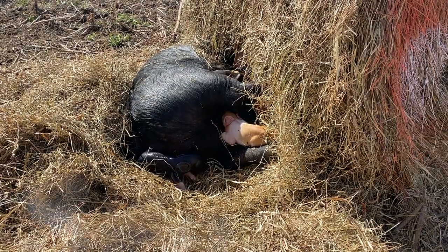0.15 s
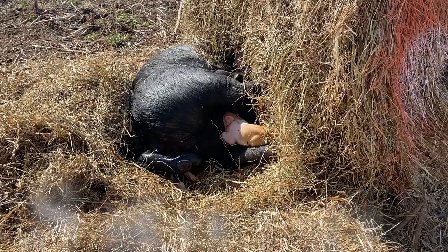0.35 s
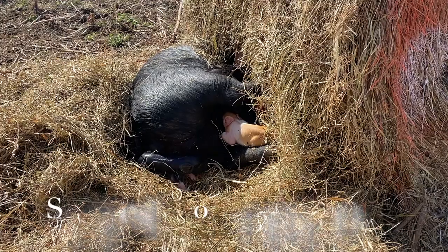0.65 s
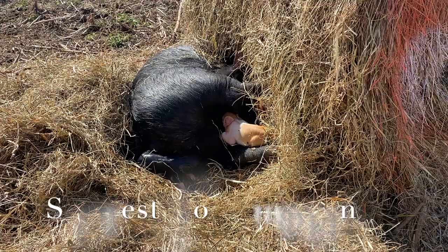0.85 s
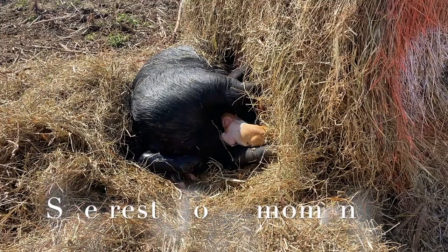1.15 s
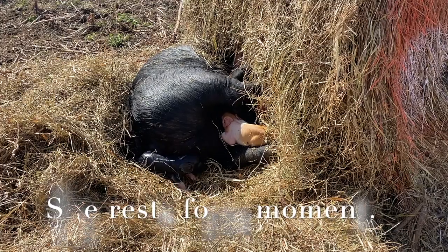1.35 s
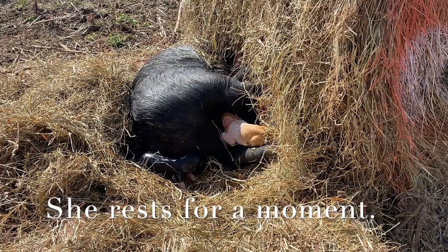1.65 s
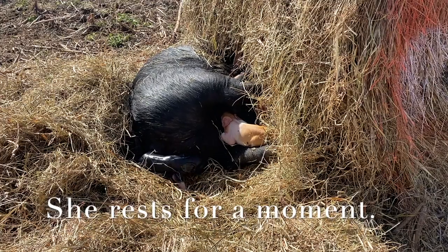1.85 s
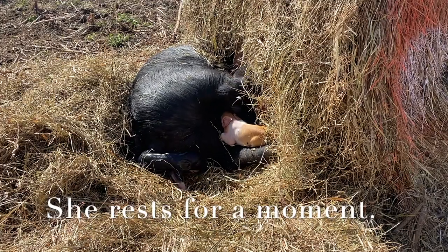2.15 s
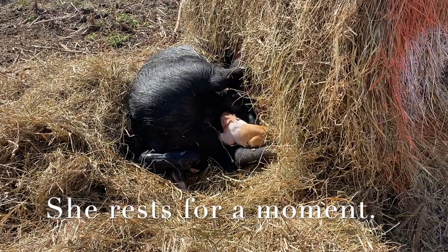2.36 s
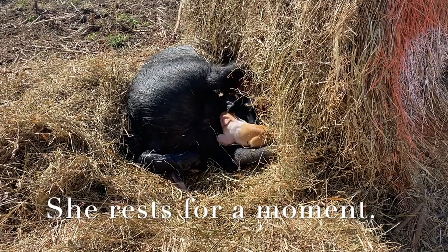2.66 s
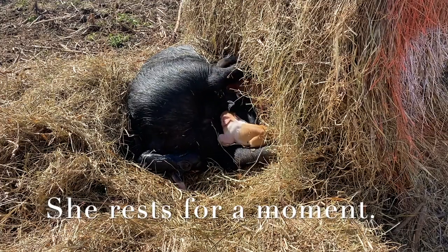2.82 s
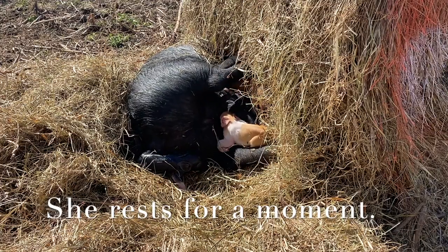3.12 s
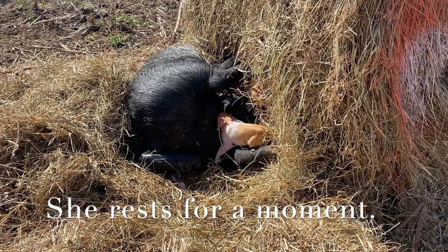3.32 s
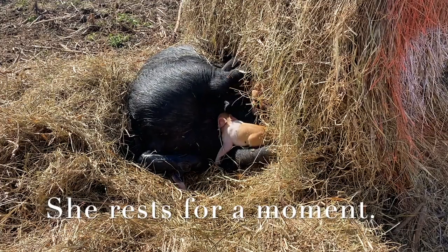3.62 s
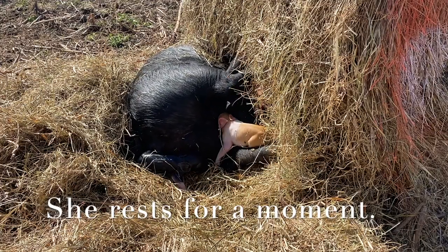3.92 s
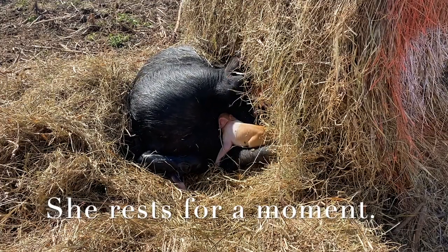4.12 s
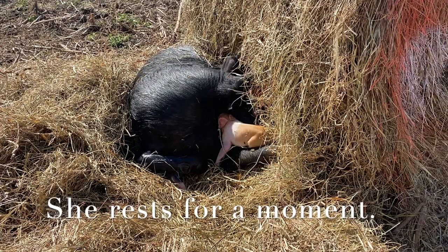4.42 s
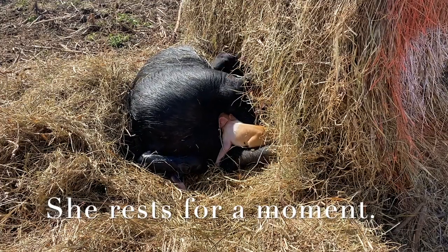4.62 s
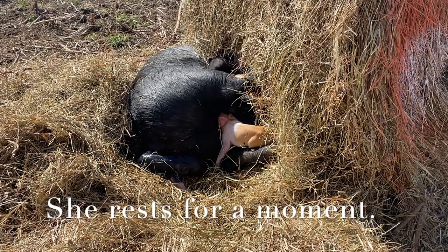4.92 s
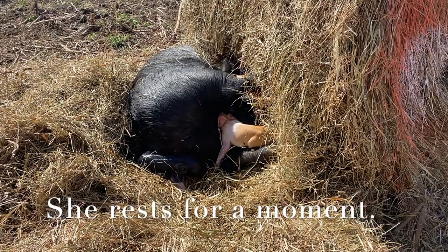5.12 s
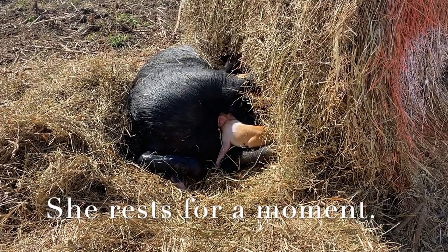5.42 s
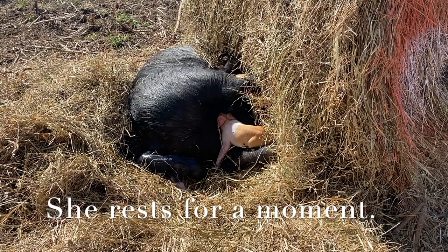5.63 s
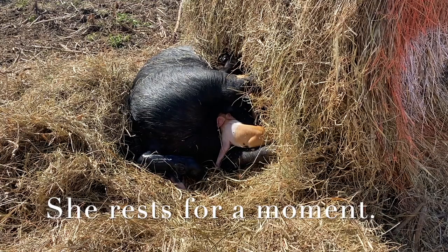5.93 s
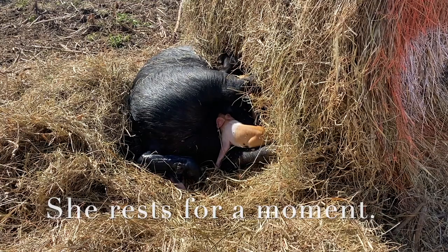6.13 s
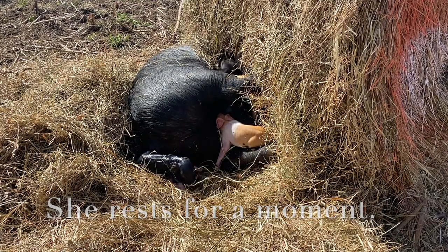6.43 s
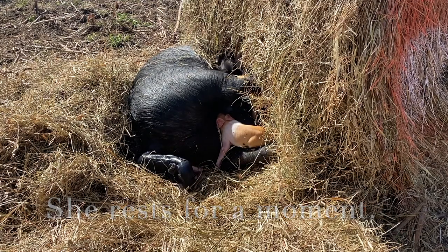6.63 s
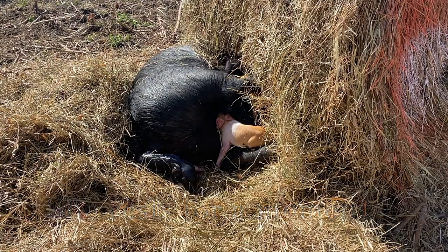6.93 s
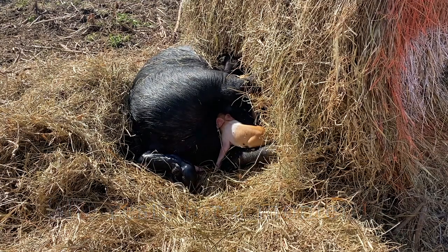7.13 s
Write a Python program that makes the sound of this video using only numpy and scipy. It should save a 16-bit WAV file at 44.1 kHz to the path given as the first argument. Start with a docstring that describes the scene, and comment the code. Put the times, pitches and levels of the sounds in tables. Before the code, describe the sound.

A close stereo microphone in a breezy farmyard picks up crunching hay, a high piglet scream under half a second long, and its weak trailing whimper. Rattling sow grunts follow in quick succession, with small lip smacks. Afterwards it calms: dry stalks tick and snap, a distant bird repeats a short arching call, occasional faint croaky grunts come and go, and soft wind rumbles throughout.

```python
"""A newborn piglet squeals in a nest of hay: a whistle with overtones, chopped into rasp by an oscillator.
The sow answers in creaking grunts, fainter on the whole later on: each flap rings her resonances.
Hay rustles, crunches and snaps as random grains and short puffs of noise; a short squeak breaks in.
A distant bird calls four times in arching harmonics, and a small bird gives one falling note.
Beneath lies wind, made of coloured noise in four bands of changing level."""
import sys
import numpy as np
from scipy import signal
from scipy.fft import rfft, irfft, next_fast_len
from scipy.io import wavfile

SR = 44100
rng = np.random.default_rng(int(sys.argv[2]) if len(sys.argv) > 2 else 0)


def file_out(sig):
    """Save sig as 16-bit WAV at sys.argv[1]."""
    # one column per channel
    cols = np.atleast_2d(sig).T
    # limit, then scale
    lim = np.clip(cols, -1, 1)
    pcm = np.round(lim * 32767).astype(np.int16)
    wavfile.write(sys.argv[1], SR, pcm)


N = 320607
TIME = np.arange(N) / SR

# Wind spectra, deepest band first: frequency_hz, gain_db
RUMBLE_COLOUR = [(18, -27), (32, -2), (48, 3), (72, 13.5), (95, 3.5), (130, -50), (400, -113)]
GUST_COLOUR = [(40, -45), (85, -3), (120, 2), (150, -10), (200, -54), (600, -131)]
BUFFET_COLOUR = [(60, -48), (130, 2), (180, 3), (280, -7.5), (400, -13.5), (800, -48), (2500, -94)]
ROAR_COLOUR = [(60, -28), (150, -4.5), (300, 3.5), (500, 1), (720, 4), (1000, -4.5), (1500, -17.5),
               (2000, -28), (4000, -32), (16000, -81)]
# Course of each wind band: time_s, level_db
RUMBLE_LEVEL = [(0, -47.5), (.7, -52), (1.4, -50), (2.2, -51.5), (2.6, -55), (3.05, -49.5), (3.35, -56),
                (3.85, -54.5), (4.1, -52), (5.3, -49), (5.65, -53), (6.4, -52), (7.27, -51.5)]
GUST_LEVEL = [(0, -63), (.4, -58), (.85, -46.5), (1.2, -47), (1.5, -42.5), (1.9, -48), (2.3, -44.5),
              (2.85, -52.5), (3.12, -38), (3.25, -53), (3.8, -45.5), (4.3, -49), (4.7, -46), (5.45, -51),
              (5.8, -46), (6.6, -48.5), (6.9, -49.5), (7.27, -45)]
BUFFET_LEVEL = [(0, -44.5), (.33, -50), (.47, -42.5), (1.3, -45.5), (1.62, -40.5), (1.88, -53), (2.25, -45),
                (2.55, -38), (3.05, -42), (3.3, -54), (4.2, -47.5), (4.9, -47), (5.45, -54), (5.98, -51.5),
                (6.27, -41.5), (6.55, -50.5), (6.75, -50), (7.27, -48)]
ROAR_LEVEL = [(0, -49), (.8, -51), (1.3, -49.5), (2, -48.5), (2.5, -49.5), (2.9, -52.5), (3.2, -47.5),
              (3.35, -54.5), (3.7, -49.5), (4.4, -56.5), (4.8, -50.5), (5.15, -55), (5.45, -58.5),
              (6.2, -56.5), (6.8, -60), (7.27, -57)]
EDDY_HZ, EDDY_DB, ROAR_EDDY_DB = 9, 0.9, 3  # pace and depths of the wind's chance swells

# Calls of the distant bird: arch_top_s, length_s, top_pitch_hz, level_db
BIRD_CALLS = [(2.481, 0.12, 778.6, -49), (3.244, 0.11, 782, -51.5), (3.989, .12, 772, -52),
              (4.535, 0.13, 770, -53.5)]
# Fixed throat resonances of that bird: frequency_hz, gain_db
BIRD_THROAT = [(700, -42), (1200, -21), (1400, 8.5), (1560, 16), (1700, 4), (1950, 4), (2350, -4.5),
               (2700, -46), (4000, -26)]
BIRD_FADE_DB = -4  # from the start of a call to its end
PEEP_AT_S, PEEP_START_HZ, PEEP_END_HZ, PEEP_DB = 7.085, 6680, 6590, -73

# Faint rustle as the nest settles, before colouring: time_s, level_db
SETTLING = [(0, -70), (1.1, -67), (2.9, -67), (4.3, -69), (5.2, -72), (5.9, -76), (7.27, -76)]
# Swells of rustle as the animals shift, before colouring: centre_s, length_s, level_db
SHIFTS = [(.68, 0.33, -61.5), (1.355, 0.11, -58), (1.71, 0.3, -64.5), (2.26, 0.48, -61), (2.38, 0.2, -54),
          (3.588, 0.3, -58), (4.08, 0.31, -64), (4.75, 0.42, -67.5), (6.421, 0.43, -76)]
# Spectrum of the rustle: frequency_hz, gain_db
HAY_COLOUR = [(600, -16), (1500, 4.5), (2500, -2.5), (4500, 2.5), (7000, 3), (9500, 5.5), (12000, 4.5),
              (13500, 2), (14700, -1.5), (16000, -4), (18000, -37)]
STIR_HZ, STIR_DB = 10.1, 2.5  # pace and depth of the rustle's unevenness
# A hoof crushing the hay: time_s, level_db
CRUNCH = [(0.10, -55), (0.116, -48), (0.124, -40.5), (0.14, -41), (0.16, -42), (0.185, -55), (0.23, -57),
          (0.27, -78)]
# Spectrum of the crunch: frequency_hz, gain_db
CRUNCH_COLOUR = [(400, -17), (850, -1), (1150, 22.5), (1500, 15), (2000, 1), (3600, -2), (4700, 6.5),
                 (6000, -6), (8000, -1), (13000, -3), (16000, -14)]
# Loudest stalks snapping: start_s, peak_db
SNAPS = [(0.1203, -21), (1.454, -43), (1.474, -33), (1.6728, -33), (2.6782, -36.5), (2.984, -32.5),
         (3.256, -34), (3.5038, -24.5), (3.532, -21), (3.724, -35.5), (3.8666, -32.5), (3.917, -31),
         (5.302, -42), (5.445, -36), (6.555, -40.5)]
# Spectrum of a snapping stalk: frequency_hz, gain_db
SNAP_COLOUR = [(500, -22), (1800, 1), (3500, 4), (7000, 5.5), (12000, 8), (16000, 4.5)]

# Short, broken squeak: time_s, pitch_hz, level_db
CHIRP = [(1.243, 1150, -64), (1.254, 1390, -52.5), (1.26, 1020, -54), (1.272, 1760, -57),
         (1.281, 1660, -57), (1.301, 1220, -62), (1.313, 985, -64)]

# Grunts of the sow: start_s, length_s (before slowing), first_flap_rate_hz, mouth_open_s,
# peak_place (0 to 1), body_swell_db, creak_swell_db, chest_db, throat_db, mouth_db, snout_db, snap_db,
# nose_db, chest_hz, throat_hz, main_snout_hz, second_snout_hz, third_snout_hz, nose_hz
GRUNTS = [(1.36, .335, 44.34, .055, 0.084, 1.5, 3.2, -37.5, -46, -49.5, -56, -76, -62, 304, 668, 2920, 1880, 2300, 4670),
          (1.8207, 0.064, 46.72, .025, .4, 2.3, 3.8, -34.5, -45, -46, -53, -54, -57.5, 292, 676, 3460, 3020, 2410, 4960),
          (1.9979, 0.073, 47.74, .042, 0, 1.9, 6.5, -34, -43, -49.5, -49, -54, -67, 304, 728, 2240, 2030, 2850, 5430),
          (2.111, 0.063, 46, .06, 0.67, 2.2, 4, -49, -52, -67, -70, -76, -80, 288, 710, 3480, 2000, 3700, 5000),
          (2.1936, 0.093, 47.72, .047, 0.86, 1.7, 3.3, -35, -40, -54, -44, -45.5, -58, 319, 703, 3320, 1960, 3680, 4700),
          (2.590, 0.1, 39.27, .06, 0.061, 4.4, 6, -36.5, -42, -61, -65.5, -80, -74, 280, 650, 2190, 1510, 3080, 4850),
          (4.722, .14, 39.48, .14, 0.51, 4.2, 12, -47.5, -48, -69, -67, -81, -85, 304, 710, 3457, 4680, 3600, 5010),
          (5.104, .1, 48.35, .1, 0.49, 12.7, 15, -44, -46, -74, -76, -91, -76, 307, 680, 2513, 3100, 4610, 4950),
          (5.215, 0.12, 52.4, .1, 0.033, 4.5, 14, -56, -72, -75, -73.5, -88, -93, 297, 690, 2420, 2520, 4660, 4910),
          (5.723, 0.13, 36.43, .14, 0, 7, 25, -49, -56, -73, -64, -85, -72.5, 294, 687, 3540, 3480, 3500, 5190),
          (6.0421, 0.17, 46.2, .2, 0.55, 16, 12.5, -45.5, -44.5, -66, -66.5, -79, -73, 288.3, 654, 3200, 2590, 3197, 4907),
          (6.222, 0.16, 44.14, .2, 1, 2.8, 11, -60, -58, -75, -64.5, -82, -66.5, 294, 691, 3090, 2530, 3060, 5070),
          (6.659, 0.071, 30.98, .08, 0.0047, 16.4, 35, -46, -48, -63, -80, -82, -78, 297.5, 700, 3600, 2576, 2970, 4930),
          (6.9104, 0.068, 35, .08, 0.079, 3.3, 9.6, -64, -61, -81, -61, -61, -88, 298, 690, 3670, 3462, 2940, 4800),
          (7.1719, 0.079, 39.36, .06, 0.5, 10.7, 25, -36, -42, -56, -52.5, -70, -60.5, 295.6, 684, 3095, 3706, 1752, 5350)]
# Chest resonances: multiple_of_chest_hz (a ratio), width_hz, relative_level_db
CHEST = [(1, 70, 2.5), (1.5, 122, -10)]
# Mouth resonances: frequency_hz, width_hz, relative_level_db
MOUTH = [(1103, 105, 4.5), (1350, 176, -0.5), (970, 150, 0.5)]
# Strength of the main, second and third snout resonances: relative_level_db
SNOUT_DB = (2.5, 2, -3)
THROAT_WIDTH_HZ, SNOUT_WIDTH_HZ, NOSE_WIDTH_HZ = 130, 310, 600
SLOWING = .276  # delay of a flap in s, per squared second into the grunt
SHUT_S, SHUT_SAG = 0.034, .06  # closing time of the mouth; share by which chest and mouth resonances sink
SHUT_CHEST_DB, SHUT_MOUTH_DB, SHUT_CREAK_DB = -8, -7, -20  # change of level as the mouth shuts
FLAP_DB, BODY_WAVER = .9, .025  # chance spread of flap strength, and of chest and throat tuning (share)
SNOUT_WAVER = 0.016  # scale of the snout's chance detuning, a share of its pitch
SNAP_S, SNAP_RISE = 0.0067, 0.36  # length of a flap's snap, and its upward glide as a share of its pitch
# Wet smacks of a mouth, and a few faint creaking ticks (the earliest ones): start_s, peak_db, resonance_hz
SMACKS = [(.01, -39, 3800), (0.019, -47, 3500), (.029, -44, 3200), (.29, -47, 3640), (1.236, -34, 1810),
          (1.6736, -29.5, 2300), (1.682, -39, 2100), (1.926, -48, 3400), (2.501, -37.5, 2220),
          (3.112, -38, 4130), (3.16, -51, 2100), (5.523, -43.5, 2580), (6.151, -58, 1390),
          (6.693, -47.5, 3080)]

# Three stretches of the piglet's voice:
# time_s, whistle_hz, whistle_db, rasp_db, second_oscillator_hz, octave_db
SCREAM = [(.42, 2916, -62.5, -62, 1086, -70), (.478, 3480, -60, -68, 1103, -67),
          (.486, 3480, -42, -42, 1150, -41), (.5, 3480, -45, -46.5, 1149, -51),
          (.517, 3655, -38, -37, 884, -62), (.543, 3305, -40, -41, 1133, -51),
          (.573, 3403, -39, -43, 1216, -50), (.602, 3332, -37.5, -43, 1188, -43.5),
          (.632, 3390, -38.5, -43.5, 1013, -61), (.685, 3432, -43, -47, 992, -65),
          (.7, 3516, -44, -50, 944, -63), (.735, 3540, -33.5, -48, 960, -58),
          (.755, 3546, -39, -44, 1100, -59), (.803, 3600, -34.5, -40, 1011, -58),
          (.831, 3400, -36, -44, 1030, -54), (.842, 2830, -38, -29, 1053, -55)]
SIGH = [(.845, 3506, -66, -51, 1100, -68), (.877, 3560, -41, -44.5, 1097, -76),
        (.915, 3520, -59, -58, 1099, -77), (.965, 3550, -63, -74, 1110, -77),
        (.98, 3600, -62, -76, 1110, -77)]
WHINE = [(.972, 3150, -51, -61, 793, -70), (.988, 3060, -50, -59, 942, -71),
         (1.015, 3020, -54, -49, 1020, -76), (1.045, 3110, -57, -49.5, 1015, -65),
         (1.1, 3050, -60, -52, 876, -65), (1.165, 2980, -56.5, -56.5, 760, -83),
         (1.222, 3340, -59, -55.5, 957, -82), (1.28, 3150, -47.5, -53, 1100, -71),
         (1.32, 3172, -55.5, -60.5, 845, -76), (1.372, 3190, -38.5, -56, 914, -64.5),
         (1.402, 2850, -61, -63, 800, -71), (1.42, 3195, -64, -61, 901, -74),
         (1.445, 3170, -59, -53, 897, -69), (1.46, 3120, -49, -54.5, 644, -64),
         (1.48, 3160, -54.5, -67, 874, -77), (1.52, 3120, -61, -67, 917, -73),
         (1.59, 3210, -60, -70, 913, -72), (1.66, 3160, -68, -71, 900, -76),
         (1.7, 3140, -76, -78, 900, -86)]
# Piglet's throat with the mouth wide open, then half shut: frequency_hz, gain_db
OPEN_THROAT = [(300, -35), (700, -1), (1400, -13), (1850, -6.5), (2200, -8), (2800, -13.5), (3500, 6),
               (3900, -3), (4450, 3.5), (4950, -1.5), (5500, -12), (6200, -18), (7200, -18), (8100, -22),
               (10000, -30), (11000, -12), (12000, -23), (13000, -41.5), (16000, -44)]
HALF_SHUT_THROAT = [(300, -25), (900, 17.5), (1750, -15), (2080, 14), (2400, 9.5), (2680, 8.5), (3100, -6),
                    (4100, 14.5), (4700, 0), (6300, -10), (7600, -31), (9100, -6), (10500, -6),
                    (16000, -35)]
FLUTTER_HZ, FLUTTER = 92.1, 0.073  # mean rate and depth of the voice's tremble
SECOND_DRIFT = 0.0194  # slow rms wandering of the second oscillator, as a share of its pitch
OVERTONE_ROUGH = 0.26  # fast rms unevenness of the overtones
THIRD_DB = -22.5  # third harmonic against the first

# Phase between the two microphone ports: frequency_hz, left_lead_rad
PIG_PHASE = [(0, 0), (200, .7), (300, 1.6), (400, 2.1), (700, 2.6), (1400, 3.15), (1700, 3.5), (3300, 7.9),
             (4900, 10.9), (5900, 15.5), (7000, 18.9), (7700, 18.6), (8500, 15.8), (9400, 15.6),
             (10400, 12.7), (12000, 12.4), (12900, 9.5), (13900, 9.4), (14600, 6.3)]
HAY_PHASE = [(0, 0), (150, .5), (780, 2.6), (1300, 2.9), (2150, 0), (7500, 0), (8500, -3.05), (9400, -3.25),
             (10400, -6.1), (12000, -6.5), (12900, -9.35), (13900, -9.5), (14600, -12.5)]
BIRD_PHASE = [(0, -6.5), (1550, 4), (7000, 11.5)]
AHEAD_PHASE = [(0, 0), (16000, 0)]
# Level difference between the ports: frequency_hz, left_minus_right_db
BALANCE_DB = [(40, 7), (110, 2.5), (350, 5), (700, 4.5), (1300, 5), (2400, 2.5), (4400, 4.5), (8000, -0.5),
              (15000, 0.5)]
# Spectrum that the yard sends back: frequency_hz, gain_db
YARD_COLOUR = [(150, -28), (350, -12), (1400, 14.5), (3300, 5.5), (7000, 1), (14000, -32)]
YARD_T60_S, YARD_BUILD_S = 1.07, 0.047  # decay time, and time over which the tail builds up
EDGE_HZ = 15950


def amp(db):
    """Decibel law: 20 dB is a factor of ten in amplitude."""
    return 10 ** (np.asarray(db) / 20)


def evened(x):
    """Normalization: rms 1."""
    return x / np.sqrt(np.mean(x ** 2) + 1e-20)


def turned(hz):
    """Phase accumulation: the running integral of frequency, in radians."""
    return 2 * np.pi * np.cumsum(hz) / SR


def read(points, hz):
    """Logarithmic interpolation: a spectrum is joined by straight lines over log frequency."""
    f, value = np.transpose(points)
    return np.interp(np.log(hz + 1), np.log(f + 1), value)


def course(points):
    """Linear interpolation: (time_s, value) points are joined by straight lines."""
    return np.interp(TIME, *np.transpose(points))


def add(mix, start_s, sound):
    """Superposition: a sound is summed into the mix from start_s."""
    part = mix[max(round(start_s * SR), 0):][:len(sound)]
    part += sound[:len(part)]


def coloured(x, points):
    """Linear filtering: the spectrum is multiplied by the gains of (frequency_hz, gain_db) points."""
    size = next_fast_len(len(x) + 2048)
    gain = amp(read(points, np.fft.rfftfreq(size, 1 / SR)))
    return irfft(rfft(x, size) * gain, size)[:len(x)]


def wander(size, hz):
    """Low-pass noise: smooth chance of rms 1, mostly slower than hz."""
    padded = next_fast_len(size)
    f = np.fft.rfftfreq(padded, 1 / SR)
    smooth = rfft(rng.standard_normal(padded)) / (1 + (f / hz) ** 4)
    return evened(irfft(smooth, padded)[:size])


def puff(seconds, air, size=2048):
    """Impulsive excitation: a click plus a quickly dying puff of air."""
    noise = rng.standard_normal(size) * np.exp(-np.arange(size) / (seconds * SR))
    return signal.unit_impulse(size) + air * noise / np.linalg.norm(noise)


def ring(push, modes):
    """Resonance: a push makes (hz, width_hz, db) modes swell and decay; the result has energy 1."""
    t = np.arange(len(push)) / SR
    body = np.zeros(len(push))
    for hz, width, db in modes:
        swell = width ** 2 * t * np.exp(-np.pi * width * t)
        body += amp(db) * swell * np.sin(2 * np.pi * hz * t)
    out = signal.fftconvolve(push, body)[:len(push)]
    return out / np.linalg.norm(out)


def ports(x, phase, scatter_db, t60):
    """Two-point reception: each port hears the sound out of step, plus its own scatter."""
    size = next_fast_len(N + SR)
    hz, t = np.fft.rfftfreq(size, 1 / SR), np.arange(SR // 2) / SR
    tail = rng.standard_normal((2, len(t))) * amp(-60 * t / t60) * (t > .002)
    scatter = rfft(tail / np.linalg.norm(tail, axis=1, keepdims=True), size)
    scatter *= amp(scatter_db) * hz / (hz + 200)  # long waves scatter less
    side = np.array([[.5], [-.5]])  # left, right
    direct = np.exp(1j * side * np.interp(hz, *np.transpose(phase)))
    balance = amp(side * read(BALANCE_DB, hz))
    return irfft(rfft(x, size) * (direct + scatter) * balance, size)[:, :N]


def yard(x, db):
    """Diffuse reverberation: far walls and bales return a faint tail, different at each port."""
    t = np.arange(SR) / SR
    tail = rng.standard_normal((2, SR)) * amp(-60 * t / YARD_T60_S) * np.minimum(t / YARD_BUILD_S, 1)
    tail /= np.linalg.norm(tail, axis=1, keepdims=True)
    return amp(db) * signal.fftconvolve(coloured(x, YARD_COLOUR)[None], tail, axes=1)[:, :N]


def wind():
    """Turbulence noise: rumble, gusts, buffeting and roar; all but the buffeting get chance swells too."""
    layers = [(RUMBLE_COLOUR, course(RUMBLE_LEVEL) + EDDY_DB * wander(N, EDDY_HZ)),
              (GUST_COLOUR, course(GUST_LEVEL) + EDDY_DB * wander(N, EDDY_HZ)),
              (BUFFET_COLOUR, course(BUFFET_LEVEL)),
              (ROAR_COLOUR, course(ROAR_LEVEL) + ROAR_EDDY_DB * wander(N, EDDY_HZ))]
    return sum(amp(db) * evened(coloured(rng.standard_normal(N), colour)) for colour, db in layers)


def peep():
    """Frequency glide: one short falling note of a small bird."""
    out, glide = np.zeros(N), np.linspace(PEEP_START_HZ, PEEP_END_HZ, round(0.055 * SR))
    add(out, PEEP_AT_S, amp(PEEP_DB) * evened(np.sin(turned(glide)) * np.hanning(len(glide))))
    return out


def birds(arch=0.39, hoarse=0.068):
    """Source and filter: harmonics of an arching pitch, hoarse at first, pass a fixed throat and fade."""
    out = np.zeros(N)
    for top_s, length, top_hz, db in BIRD_CALLS:
        u = np.linspace(-1, 1, round(length * SR))  # 0 at the top of the arch
        jitter = (0.002 + hoarse * np.maximum(-u, 0)) * wander(len(u), 460)
        hz = top_hz * (1 - arch * abs(u) ** 2.2) * (1 + jitter)
        angle = turned(hz)
        call = sum(amp(read(BIRD_THROAT, k * hz)) * np.sin(k * angle) for k in range(1, 6))
        call = evened(call * amp(BIRD_FADE_DB * u / 2))
        add(out, top_s - length / 2, amp(db) * call * signal.windows.tukey(len(u), .25))
    return out


def crackle(per_s, spread_db, hiss):
    """Random impulse process: tiny fibres break, a few of them large, over a smooth hiss."""
    size_db = spread_db * np.minimum(rng.exponential(1, N), 4)
    grains = (rng.random(N) < per_s / SR) * rng.standard_normal(N) * amp(size_db)
    return evened(grains) + hiss * rng.standard_normal(N)


def rustle():
    """Addition of powers: creaking, ticking fibres swell each time the animals shift."""
    fibres = crackle(2500, spread_db=3, hiss=1.8) + .6 * crackle(70, spread_db=3, hiss=0)
    power = amp(course(SETTLING)) ** 2
    for centre, length, db in SHIFTS:
        power += amp(db) ** 2 * np.exp(-2 * np.pi * ((TIME - centre) / length) ** 2)
    stir = amp(STIR_DB * wander(N, STIR_HZ))
    return np.sqrt(power) * stir * coloured(evened(fibres), HAY_COLOUR)


def stalks():
    """Fracture noise: one crunch of many breaks, and single snapping stalks."""
    force = amp(np.interp(TIME, *np.transpose(CRUNCH), left=-120, right=-120))
    out = force * evened(coloured(crackle(5500, spread_db=3, hiss=0.66), CRUNCH_COLOUR))
    for start, db in SNAPS:
        snap = coloured(np.pad(puff(0.0024, air=1.14), 24), SNAP_COLOUR)
        add(out, start, amp(db) * snap / abs(snap).max())
    return out


def hay():
    """Common source position: rustle and snaps reach the ports with one phase law."""
    return ports(rustle() + stalks(), HAY_PHASE, scatter_db=-14.5, t60=0.099)


def chirp(hoarse=0.027):
    """Frequency modulation: one hoarse squeak breaks upward and slides down."""
    out, (s, hz, db) = np.zeros(N), np.transpose(CHIRP)
    t = np.arange(s[0], s[-1], 1 / SR)
    tone = np.sin(turned(np.interp(t, s, hz) * (1 + hoarse * wander(len(t), 560))))
    add(out, s[0], amp(np.interp(t, s, db)) * evened(tone) * signal.windows.tukey(len(t), .1))
    return out


def flap_snap(hz, size=2048):
    """Transient glide: a few cycles sweep up through hz and die away; energy 1."""
    u = np.minimum(np.arange(size) / (SNAP_S * SR), 1)
    snap = np.sin(np.pi * np.sqrt(u)) ** 2 * np.sin(turned(hz * (1 + SNAP_RISE * (u - .33))))
    return snap / np.linalg.norm(snap)


def smacks():
    """Damped resonance: a click and puff ring broad modes, giving wet mouth smacks and faint creaking ticks."""
    out = np.zeros(N)
    for start, db, hz in SMACKS:
        smack = ring(puff(0.0021, air=1.0), [(hz, 1500, 0), (1600, 900, -4), (550, 400, -6)])
        add(out, start, amp(db) * smack / abs(smack).max())
    return out


def grunts():
    """Pulse-excited resonance: each slow flap of the vocal folds rings chest, throat, mouth, snout and nose."""
    out = np.zeros(N)
    for (start, length, rate, open_s, peak, swell_db, bright_db, chest_db, throat_db, mouth_db, snout_db,
         snap_db, nose_db, chest_hz, throat_hz, *snout_hz, nose_hz) in GRUNTS:
        for t in np.arange(0, length, 1 / rate):
            slack = np.interp(t / length, [0, peak, 1], [1, 0, 1])  # 0 at the peak of the grunt
            shut = np.clip((t - open_s) / SHUT_S, 0, 1)
            sag = 1 - SHUT_SAG * shut
            chest_off, throat_off, strength = rng.standard_normal(3)
            chest_now = chest_hz * sag * (1 + BODY_WAVER * chest_off)
            chest = [(k * chest_now, width, db) for k, width, db in CHEST]
            throat = [(throat_hz * (1 + BODY_WAVER * throat_off), THROAT_WIDTH_HZ, 0)]
            mouth = [(hz * sag, width, db) for hz, width, db in MOUTH]
            snout = [(hz * (1 + SNOUT_WAVER * rng.uniform(-0.19, 1)), SNOUT_WIDTH_HZ, db)
                     for hz, db in zip(snout_hz, SNOUT_DB)]
            push = puff(.004, air=.35)
            body = amp(chest_db + SHUT_CHEST_DB * shut) * ring(push, chest)
            body += amp(throat_db) * ring(push, throat)
            body += amp(mouth_db + SHUT_MOUTH_DB * shut) * ring(push, mouth)
            creak = amp(snout_db) * ring(puff(.0035, air=.9), snout)
            creak += amp(snap_db) * flap_snap(snout_hz[0])
            creak += amp(nose_db) * ring(puff(0.0042, air=1.0), [(nose_hz, NOSE_WIDTH_HZ, 0)])
            flap = amp(-swell_db * slack) * body + amp(SHUT_CREAK_DB * shut - bright_db * slack) * creak
            flap *= amp(FLAP_DB * strength) * np.sqrt(SR / rate)  # energy per flap to mean power
            add(out, start + t * (1 + SLOWING * t), flap)
    return out


def overtone(angle, k):
    """Harmonic series: the k-th harmonic, of uneven strength and rms 1."""
    size = len(angle)
    uneven = 1 + 0.49 * wander(size, 110) + OVERTONE_ROUGH * wander(size, 530)
    return evened(np.sin(k * angle) * uneven)


def squeal(rows, throat, jitter, wobble, breath, sideband_db):
    """Amplitude modulation: a second oscillator chops a whistle with overtones into rasping sidebands."""
    s, *columns = np.transpose(rows)
    t = np.arange(s[0], s[-1], 1 / SR)
    size = len(t)
    hz, whistle_db, rasp_db, second_hz, octave_db = (np.interp(t, s, c) for c in columns)
    angle = turned(hz * (1 + jitter * wander(size, 980)))
    chop = turned(second_hz * (1 + wobble * wander(size, 414) + SECOND_DRIFT * wander(size, 23.5)))
    tremble = 1 + FLUTTER * np.sin(turned(FLUTTER_HZ * (1 + 0.2 * wander(size, 40))))

    whistle = evened(np.sin(angle) * (1 + 0.1 * wander(size, 170)))
    octave, third = overtone(angle, 2), overtone(angle, 3)

    carrier = np.sin(angle) + np.sin(2 * angle) + amp(4.5) * np.sin(3 * angle)
    sidebands = carrier * (np.cos(chop) + amp(sideband_db) * np.cos(2 * chop))
    sidebands *= 1 + 0.48 * wander(size, 90)  # the rasp flutters
    air = rng.standard_normal(size) * (1 + 3.9 * np.cos(chop))
    rasp = evened(coloured(evened(sidebands) + breath * air, throat))

    voice = amp(whistle_db) * (whistle + amp(THIRD_DB) * third)
    voice += amp(octave_db) * octave + amp(rasp_db) * rasp
    return s[0], voice * tremble * signal.windows.tukey(size, .02)


def piglet():
    """Vocal-tract filtering: an open-mouthed scream trails off, then a thinner whine, mouth half shut."""
    out = np.zeros(N)
    add(out, *squeal(SCREAM, OPEN_THROAT, jitter=.0072, wobble=.08, breath=.45, sideband_db=-7))
    add(out, *squeal(SIGH, OPEN_THROAT, jitter=.0135, wobble=0.182, breath=3.6, sideband_db=-12))
    add(out, *squeal(WHINE, HALF_SHUT_THROAT, jitter=.012, wobble=.1, breath=.5, sideband_db=-10))
    return out


def scene():
    """Superposition: wind on the microphone, birds far off, hay, and sow and piglet close by."""
    eddies = amp(-12.5) * np.array([wind(), wind()])  # each port also feels its own turbulence
    air = ports(wind(), HAY_PHASE, scatter_db=-19.5, t60=0.33) + eddies
    far = ports(birds(), BIRD_PHASE, scatter_db=-12.5, t60=1.6)
    far += ports(peep(), PIG_PHASE, scatter_db=-27, t60=0.046)
    squeak = ports(chirp(), AHEAD_PHASE, scatter_db=-14, t60=.1)
    sow = grunts() + smacks()
    mother = ports(sow, PIG_PHASE, scatter_db=-8.5, t60=.075) + yard(sow, db=-20.5)
    squeals = piglet()
    young = ports(squeals, PIG_PHASE, scatter_db=-8, t60=0.1) + yard(squeals, db=-16)
    return air + far + hay() + squeak + mother + young


def record(dry):
    """Band limitation: a steep low-pass removes what lies above EDGE_HZ."""
    lowpass = signal.firwin(511, EDGE_HZ, window=("kaiser", 9), fs=SR)
    return signal.oaconvolve(dry, lowpass[None], "same")


dry = scene()
out = record(dry)
file_out(out)
```